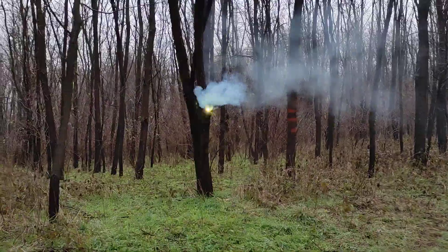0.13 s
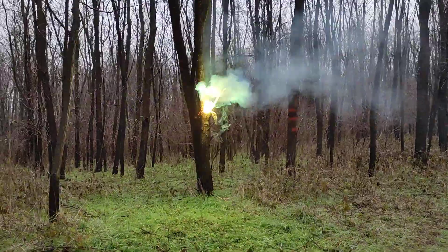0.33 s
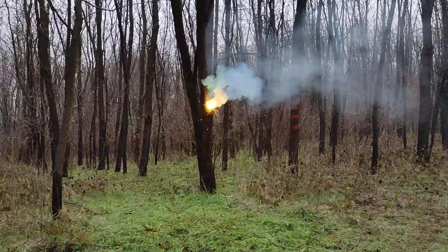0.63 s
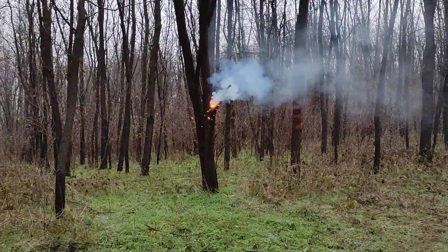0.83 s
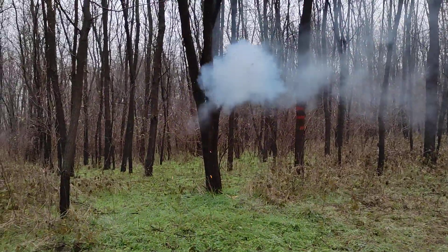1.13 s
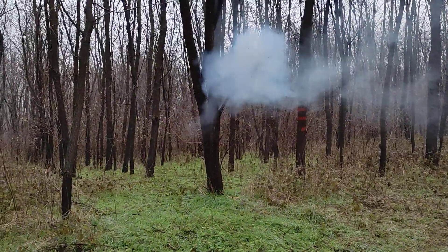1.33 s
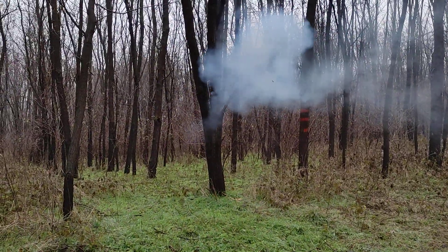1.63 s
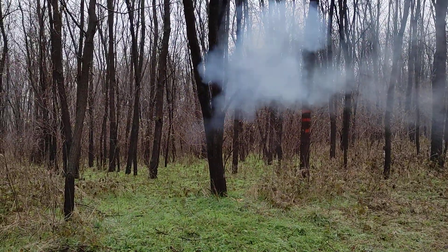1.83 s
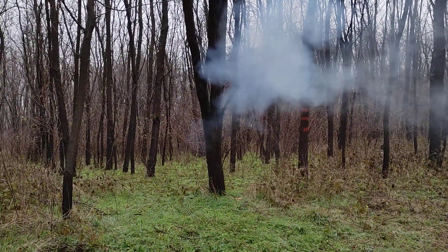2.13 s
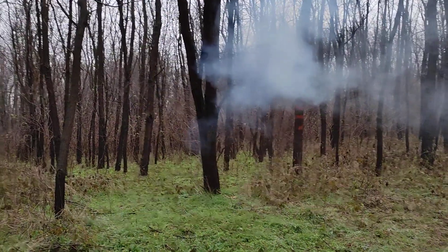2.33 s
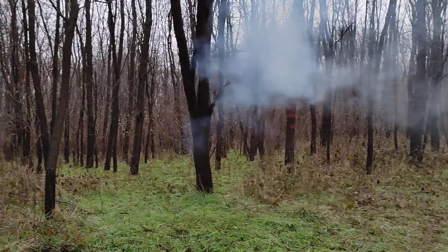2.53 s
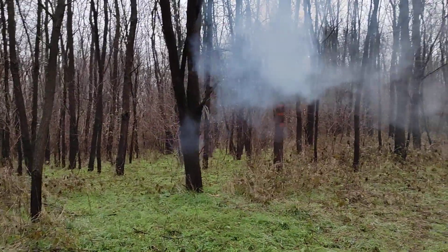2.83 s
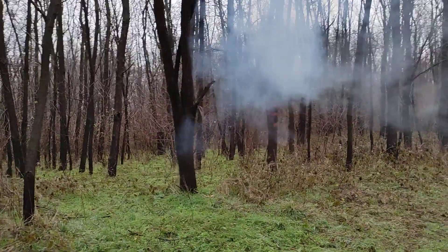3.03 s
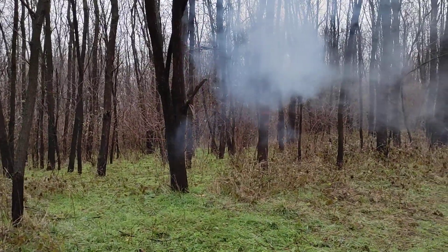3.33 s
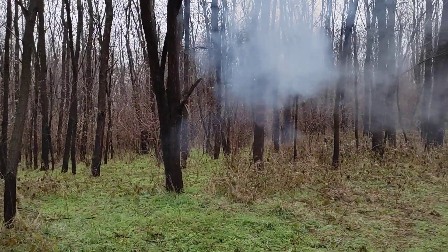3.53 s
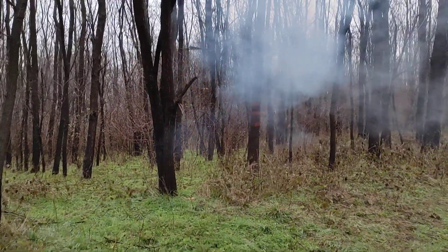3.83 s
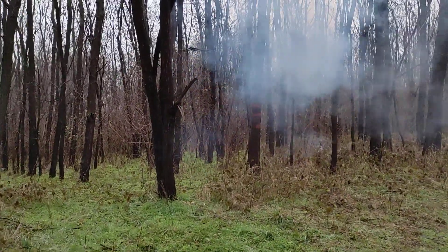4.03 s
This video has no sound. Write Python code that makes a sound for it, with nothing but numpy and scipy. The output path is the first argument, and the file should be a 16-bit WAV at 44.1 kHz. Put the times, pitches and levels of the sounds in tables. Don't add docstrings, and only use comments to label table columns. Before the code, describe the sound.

A thin gas-like fuse hiss with a low fluttering flame sputters for about a second, a bigger spit knocking the paper tube. Then the firecracker bursts: a dry, hard crack that saturates the microphone, and a thick wash of tree echoes with deep surging rumble, growing duller as it fades. Near silence returns, leaving leaf rustle, light ticks and one crisp twig snap in the open winter wood.

```python
import sys
import numpy as np
from scipy import signal
from scipy.io import wavfile
from scipy.ndimage import uniform_filter1d

SR = 44100
rng = np.random.default_rng(int(sys.argv[2]) if len(sys.argv) > 2 else 0)


def convert_level_to_amplitude(level_db):
    exponent = np.asarray(level_db, float) / 20
    return 10 ** exponent


def inscribe(sig):
    pcm = np.round(np.clip(np.atleast_2d(sig).T, -1, 1) * 32767)
    wavfile.write(sys.argv[1], SR, pcm.astype(np.int16))


N = 184293
BANG_S = 1.0458


def evened(x):
    return x / np.sqrt(np.mean(x ** 2) + 1e-20)


def read(points, hz):
    f, value = np.transpose(points)
    return np.interp(np.log(hz + 1), np.log(f + 1), value)


def summed(levels_db):
    return 10 * np.log10(sum(convert_level_to_amplitude(db) ** 2 for db in levels_db) + 1e-20)


def add(mix, s, sound):
    part = mix[:, round(s * SR):][:, :sound.shape[1]]
    part += sound[:, :part.shape[1]]


def panned(x, db):
    return x * convert_level_to_amplitude(np.array([[db / 2], [-db / 2]]))


def field(level_db, same, patchy_db, flicker_db, size):
    # (frequency [Hz], phase [rad])
    lead = [(0, 0), (600, .1), (950, 2.7), (1550, 4.0), (5000, 15.8), (16000, 50)]
    # (frequency [Hz], L-R [dB])
    tilt = [(500, 0), (1000, -0.8), (2000, -3.5), (4000, -1.5), (8000, 1), (14000, -7.5)]
    hop = size // 4
    frames, hz = N // hop + 2, np.fft.rfftfreq(size, 1 / SR)[:, None]
    a, b, c, d, patches = rng.standard_normal((frames, len(hz), 5)).T
    patches = uniform_filter1d(patches, size // 100, 0)
    patches = evened(uniform_filter1d(patches, 2048 // hop, 1))
    flicker = evened(uniform_filter1d(rng.standard_normal(frames), 3))
    likeness = np.clip(same(hz), 0, 1)
    left, other = a + 1j * b, c + 1j * d
    lag = np.exp(-1j * np.interp(hz, *np.transpose(lead)))
    right = likeness * lag * left + np.sqrt(1 - likeness ** 2) * other
    z = np.array([left, right])
    z *= convert_level_to_amplitude(read(tilt, hz) * np.array([.5, -.5])[:, None, None])
    t = np.arange(frames) * hop / SR
    z *= convert_level_to_amplitude(level_db(t, hz) + patchy_db * patches + flicker_db * flicker)
    return signal.istft(z, nperseg=size, noverlap=size - hop)[1][:, :N]


def push(rise_ms, ms, bounce):
    ground_s = 0.00241
    u = np.arange(600) / SR * 1000
    x = (1 - u / ms) * np.exp(-u / ms) * (1 - np.exp(-(u / rise_ms) ** 2))
    return (x + bounce * np.roll(x, round(ground_s * SR))) / x.max()


def blast():
    # (delay [ms], level [dB], L-R [dB])
    arrivals = [
        (0, -0.5, 3),
        (1.7, -2.5, 5),
        (2.5, 9, 2),
        (3.5, -12, 0.5),
        (4.8, -9, -1),
    ]
    out = np.zeros((2, N))
    for ms, db, pan in arrivals:
        add(out, BANG_S + ms / 1000, panned(convert_level_to_amplitude(db + 0.2) * push(rise_ms=0.024, ms=0.44, bounce=0), pan))
    return out


def forest():
    # (time [s], level [dB])
    echo = [(1.05, -15), (1.065, -12), (1.19, -14.5), (1.31, -18.5), (1.5, -17), (1.77, -17), (1.98, -22.5),
            (2.77, -36), (4.18, -54.5)]
    # (frequency [Hz], density [dB per Hz])
    early = [(110, -28.5), (190, -3.5), (235, -15.5), (290, -3.5), (394, -.5), (600, -3), (1010, -10),
             (1400, -8.5), (2410, -16), (5000, -18), (8520, -17.5), (11000, -20.5), (14800, -23),
             (16000, -38)]
    # (frequency [Hz], loss [dB per s of travel])
    loss = [(150, 35.5), (220, 23), (300, 4), (500, 0.5), (1000, 2.5), (2000, 9.5), (4000, 19.5),
            (8000, 45), (12000, 75), (16000, 172.5)]
    # (frequency [Hz], likeness [0-1])
    alike = [(60, 0.93), (150, 0.87), (300, 0.74), (650, 0.33), (1400, 0.56), (3000, 0.17), (7000, 0.065),
             (15000, .05)]
    # (frequency [Hz], density [dB per Hz])
    deep_colour = [(25, -52), (45, -31), (65, -11.5), (108, 1.5), (150, -2), (200, -8), (280, -40)]
    # (time [s], level [dB])
    returns = [
        (1.135, 3.5),
        (1.385, 2.5),
        (1.545, 0),
        (1.675, 0.5),
        (1.745, 1.5),
        (1.8, 0.5),
        (2.0, 0.5),
    ]
    return_s, return_top_hz = .018, 1500
    brighten_db, brighten_s, brighten_span_s = 8, 1.73, 0.76
    thump_db, thump_s, thump_width_s = 8, 1.12, .07
    rumble_peak_db, knee_s, build_db_per_s, fade_db_per_s = -15, 1.97, 8.5, 10.5

    def colour(t, hz):
        travel_s = np.maximum(t - 1.13, 0)
        treble = np.clip(np.log2(hz / 900 + 1e-9), 0, 3) / 3
        bright_db = brighten_db * np.clip((t - brighten_s) / brighten_span_s, 0, 1)
        surge_db = sum(db * np.exp(-((t - s) / return_s) ** 2) for s, db in returns)
        surge_db = surge_db / (1 + (hz / return_top_hz) ** 2)
        return surge_db + read(early, hz) - read(loss, hz) * travel_s ** 0.89 + treble * bright_db

    x = field(colour, lambda hz: read(alike, hz), patchy_db=0.4, flicker_db=-0.68, size=1024)
    deep = field(lambda s, hz: read(deep_colour, hz) + 0 * s, lambda hz: 0.98 + 0 * hz,
                 patchy_db=0.7, flicker_db=3.9, size=4096)
    t = np.arange(N) / SR
    body = signal.sosfilt(signal.butter(2, [250, 900], "band", fs=SR, output="sos"), x)
    rise = np.clip((t - BANG_S) / 0.0059, 0, 1) ** 0.61
    thump = thump_db * np.exp(-((t - thump_s) / thump_width_s) ** 2)
    away_db = np.maximum(fade_db_per_s * (t - knee_s), build_db_per_s * (knee_s - t))
    rumble = evened(deep) * convert_level_to_amplitude(rumble_peak_db + thump - away_db)
    echoes = x / np.std(body) * convert_level_to_amplitude(1.48)
    return (echoes + rumble) * convert_level_to_amplitude(np.interp(t, *np.transpose(echo))) * rise


def fuse():
    # (frequency [Hz], density [dB per Hz])
    hiss_colour = [(1470, -29), (2500, -9), (5690, -8), (6200, -3), (7250, -5), (9890, 0), (11100, -5.5),
                   (12100, -0.5), (16000, -11.5)]
    # (frequency [Hz], density [dB per Hz])
    roar_colour = [(400, -24.5), (600, -5), (843, 0), (1030, -11), (1240, -1.5), (1600, -3), (1900, -14),
                   (2300, -10), (3200, -16.5), (5000, -41.5)]
    # (time [s], peak [dB], push length [ms], ground bounce share [0-1], L-R [dB])
    spits = [
        (.168, -40.5, 0.29, .2, -1),
        (.388, -35.5, .24, .2, 6),
        (.544, -38, 0.13, .2, 6),
        (0.7616, -26.5, 0.49, 1, 2),
        (0.776, -37, 0.35, .4, -3),
    ]
    spit_soft = 1.6
    t = np.arange(N) / SR
    lit = t < BANG_S
    hiss = evened(field(lambda s, hz: read(hiss_colour, hz) + 0 * s, lambda hz: 0.18 + 0 * hz,
                        patchy_db=0.0, flicker_db=1.5, size=256))
    roar = evened(field(lambda s, hz: read(roar_colour, hz) + 0 * s, lambda hz: 0.11 + 0 * hz,
                        patchy_db=3.0, flicker_db=-0.7, size=512))
    hiss_db, roar_db = flares(t)
    out = lit * (hiss * convert_level_to_amplitude(hiss_db + 3.0) + roar * convert_level_to_amplitude(roar_db + 9.0))
    lean = signal.butter(2, 230, "high", fs=SR, output="sos")
    add(out, .7603, signal.sosfilt(lean, knock()))
    for s, db, ms, bounce, pan in spits:
        puff = signal.sosfilt(lean, push(spit_soft * ms ** 2, ms, bounce))
        add(out, s, panned(convert_level_to_amplitude(db) * puff, pan))
    return out


def flares(t):
    # (start [s], hiss [dB], flame roar [dB], length [s])
    flare_rows = [
        (-.1, -58, -69, 0.16),
        (0.249, -53, -64.5, 0.24),
        (0.755, -52.5, -58.5, 0.029),
    ]
    rise_s, puff_peak_db, puff_s = 0.028, 5.5, 0.035
    hiss_fade_db, roar_fade_db = 2.5, 27
    hiss, roar = [-79.5 + 0 * t], [-70.5 + 0 * t]
    for s, hiss_db, roar_db, length_s in flare_rows:
        age = t - s - rise_s
        light_db = 18 * np.minimum(age, 0) / rise_s
        puff_db = puff_peak_db * np.exp(-abs(age) / puff_s)
        hiss.append(hiss_db + light_db + puff_db - hiss_fade_db * age.clip(0) / length_s)
        roar.append(roar_db + light_db - roar_fade_db * (age / length_s - .8).clip(0))
    return summed(hiss), summed(roar)


def knock():
    # (frequency [Hz], width [Hz], level [dB])
    casing = [(380, 95, -7.5), (820, 76, -19), (1330, 200, -8.5), (4160, 130, -22), (4500, 92, -27)]
    u = np.arange(3000) / SR
    ring = sum(convert_level_to_amplitude(db) * np.exp(-np.pi * width * u) * np.sin(2 * np.pi * hz * u) for hz, width, db in casing)
    scatter = uniform_filter1d(rng.standard_normal((2, 3000)), size=6) * convert_level_to_amplitude(-7.0 - 60 * u / 0.051)
    return convert_level_to_amplitude(-20.5) * (ring + scatter) * np.minimum(u / 0.00034, 1)


def litter():
    # (frequency [Hz], density [dB per Hz])
    leaf_colour = [(700, -22), (1200, -2), (2830, -1.5), (3400, -6), (4200, -8.5), (6000, -6), (9750, -5),
                   (12500, -6.5), (14600, -16), (16000, -25)]
    # (time [s], peak [dB], pitch [Hz], L-R [dB])
    ticks = [(.79, -32.5, 8200, 3), (1.92, -38, 9500, 3), (2.25, -51, 9500, -4), (2.2985, -40, 9500, -6),
             (2.4845, -40, 9100, -3), (2.649, -34.5, 6350, -4), (2.725, -48, 8000, -3),
             (2.755, -51, 11000, -2), (2.871, -42, 10000, -6), (2.9, -43, 12000, -4),
             (3.007, -47, 10000, -5), (3.429, -48, 8200, 5), (3.515, -43, 9500, 0), (3.912, -40, 6450, 0),
             (4.04, -56, 9100, 1), (4.089, -38, 11070, -14), (4.103, -46, 10500, -7),
             (4.145, -45, 10500, -10)]
    # (time [s], peak [dB], pitch [Hz], length [ms], L-R [dB])
    snaps = [
        (.7978, -32, 1400, .3, -8),
        (2.6427, -18.5, 4450, .33, -2),
        (2.643, -29, 2200, .35, -2),
        (2.6427, -35, 8800, .3, 0),
        (2.6427, -35, 12000, .2, -3),
        (2.6454, -25, 3100, .2, -6),
        (3.879, -39, 500, 1.1, 0),
        (3.935, -44, 2600, .6, -4),
        (3.928, -47, 2300, .5, -2),
    ]
    tick_ms, tick_noisy, snap_noisy = 0.71, 0.63, .1
    t = np.arange(N) / SR
    leaves = field(lambda s, hz: read(leaf_colour, hz) + 0 * s, lambda hz: 0.073 + 0 * hz,
                   patchy_db=0.5, flicker_db=2.4, size=256)
    cracks = uniform_filter1d(1. * (rng.random(N) < 60 / SR), 40) * 40
    crackle = 1 + 2.14 * cracks * rng.random(N)
    out = evened(leaves) * crackle * convert_level_to_amplitude(rustle(t) + 4.5) * np.clip((t - 1.4) / 0.23, 0, 1)
    u = np.arange(-200, 200) / SR
    light = [(s, db, hz, tick_ms, tick_noisy, pan) for s, db, hz, pan in ticks]
    hard = [(s, db, hz, ms, snap_noisy, pan) for s, db, hz, ms, pan in snaps]
    for s, db, hz, ms, noisy, pan in light + hard:
        grit = np.diff(uniform_filter1d(rng.standard_normal((2, 401)), 2))
        snap = (1 - noisy) * np.cos(2 * np.pi * hz * u) + noisy * 0.85 * grit
        add(out, s + u[0], panned(convert_level_to_amplitude(db) * snap * np.exp(-(1000 * u / ms) ** 2), pan))
    return out


def rustle(t):
    # (time [s], level [dB], settling time [s])
    stirs = [
        (2.485, -59, 0.026),
        (2.65, -57.5, .08),
        (2.87, -60, 0.15),
        (2.97, -62, .05),
        (3.19, -61, 0.039),
        (3.43, -69.5, 0.043),
        (3.885, -58, 0.074),
        (3.93, -59, .04),
        (4.04, -66, .05),
    ]
    rise_s, calm_db = 0.013, -67.5
    shower_db, shower_s, shower_fade_db_per_s = -63.5, 2.24, 11.5
    parts = [calm_db + 0 * t, shower_db - shower_fade_db_per_s * (t - shower_s).clip(0)]
    for s, db, settle_s in stirs:
        parts.append(db - 7.2 * np.maximum((t - s) / settle_s, (s - t) / rise_s))
    return summed(parts)


def air():
    # (frequency [Hz], density [dB per Hz])
    hum_colour = [(25, -50), (50, -18), (80, -3), (130, -8), (220, -5), (344, 2.5), (480, -8), (775, -13),
                  (1100, -22.5), (2100, -18.5), (5000, -21.5), (12500, -24.5), (16000, -32)]
    alike = [(60, 0.32), (300, 0.86), (1400, .4), (4000, 0.064)]  # (frequency [Hz], likeness [0-1])
    t = np.arange(N) / SR
    x = field(lambda s, hz: read(hum_colour, hz) + 0 * s, lambda hz: read(alike, hz),
              patchy_db=2.0, flicker_db=0.5, size=1024)
    duck_db = np.where(t > BANG_S, np.clip(-30 + 18 * (t - BANG_S), -30, -1.5), 0)
    return evened(x) * convert_level_to_amplitude(-56.5 + duck_db)


def scene():
    return blast() + forest() + fuse() + litter() + air()


def roll_off(x):
    return signal.sosfilt(signal.butter(12, 16210, fs=SR, output="sos"), x)


def record(dry):
    u = np.arange(-700, 701) / SR
    ring = np.exp(u / 0.0038 - u.clip(0) / 0.00026) * np.cos(2 * np.pi * 430 * u)
    low = np.exp(-(u / 0.0061) ** 2)
    taps = (u == 0) + 0.009 * ring - .4 * low / low.sum()
    front = signal.oaconvolve(dry, taps[None], "same")
    sharp = abs(np.arange(N) / SR - BANG_S) < .012
    x = dry + uniform_filter1d(sharp * 1., 200) * (front - dry)
    held = x / (1 + abs(x / 1.02) ** 3) ** (1 / 3)
    cut = signal.sosfilt(signal.butter(3, 62, "high", fs=SR, output="sos"), held)
    cut = signal.sosfilt(signal.ellip(8, .5, 60, 16000, fs=SR, output="sos"), cut)
    return roll_off(cut)


dry = scene()
out = record(dry)
inscribe(out)
```